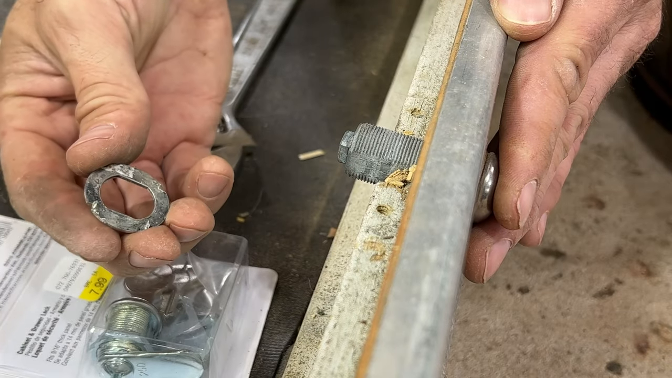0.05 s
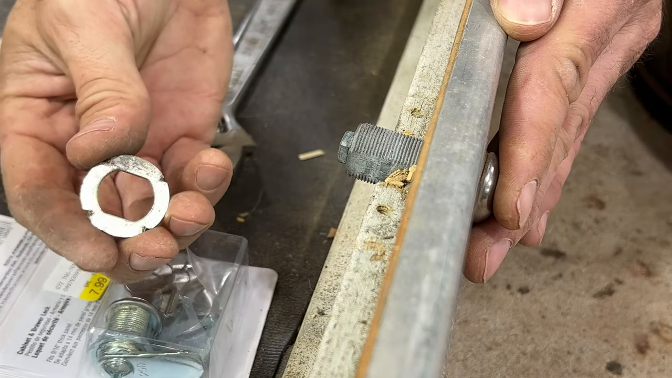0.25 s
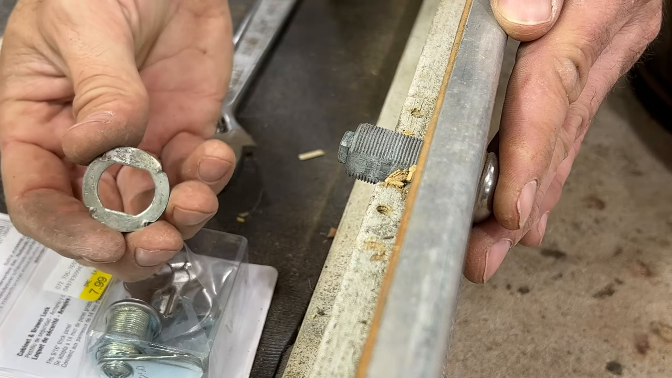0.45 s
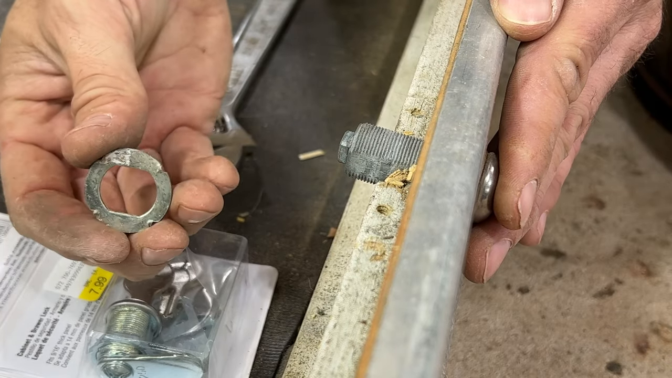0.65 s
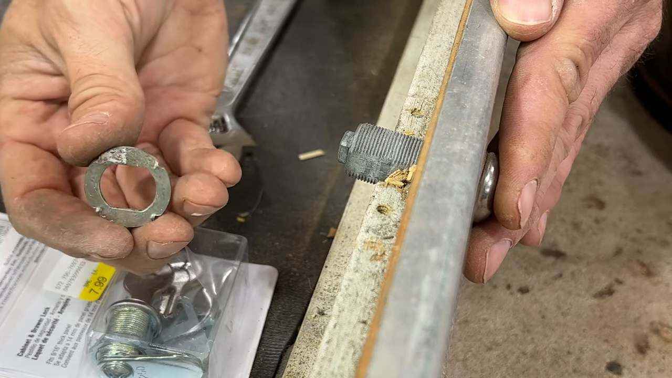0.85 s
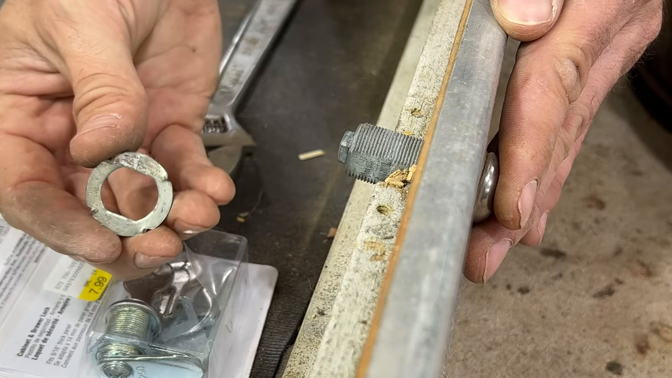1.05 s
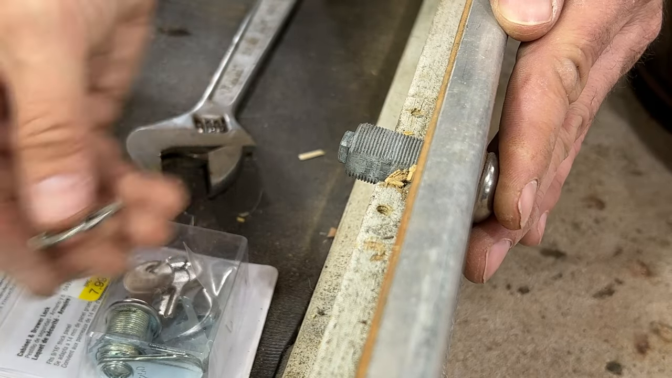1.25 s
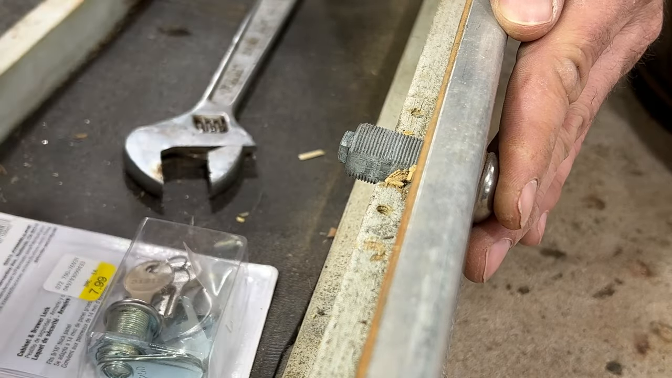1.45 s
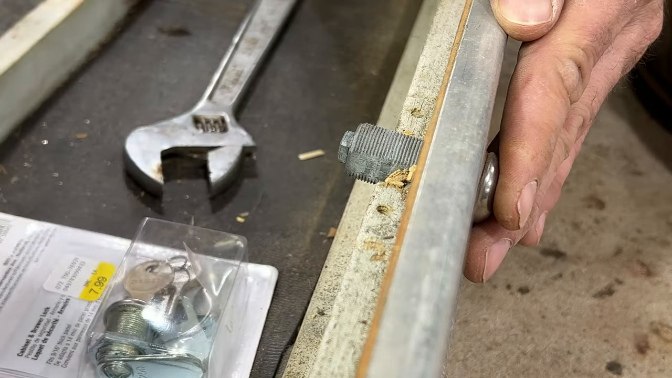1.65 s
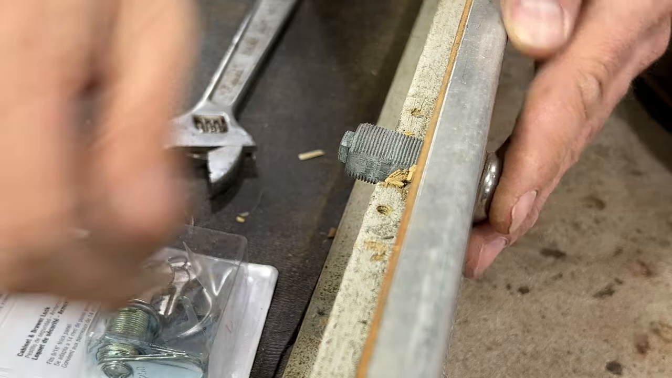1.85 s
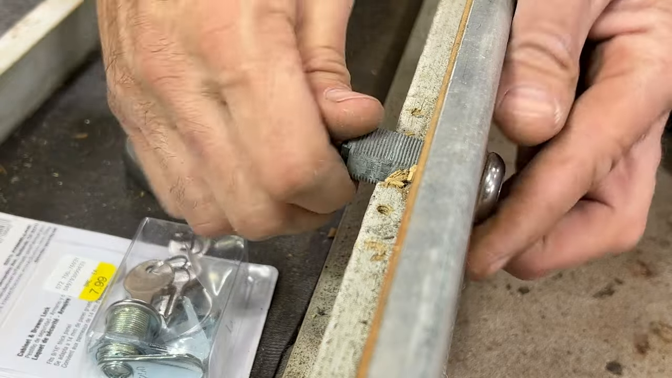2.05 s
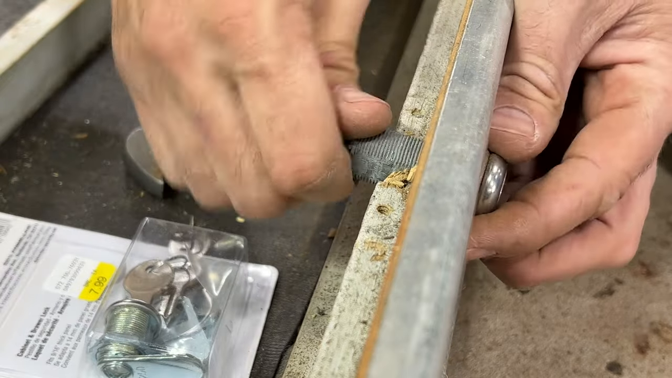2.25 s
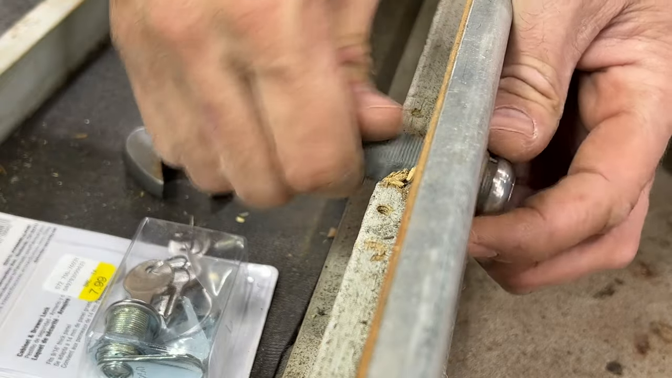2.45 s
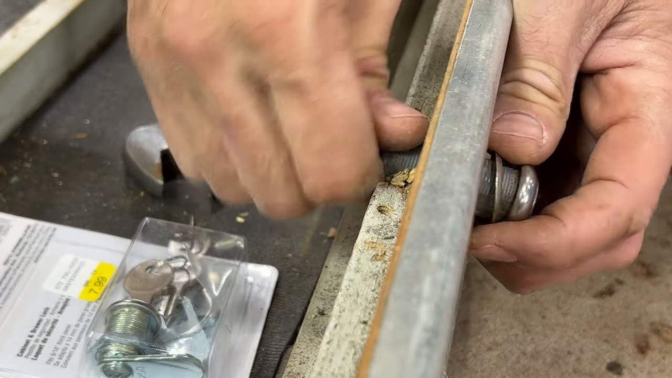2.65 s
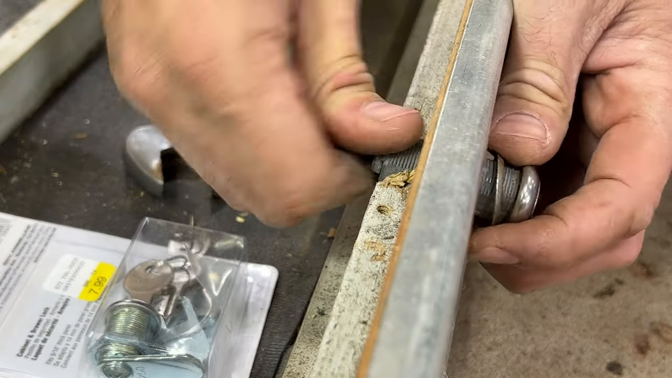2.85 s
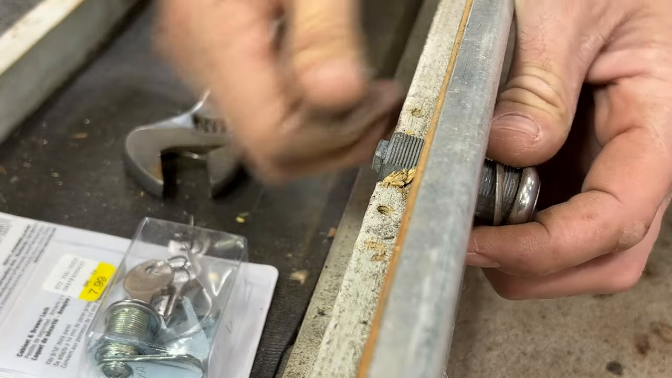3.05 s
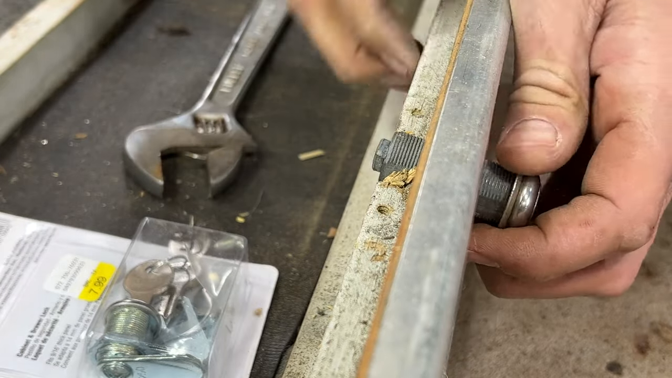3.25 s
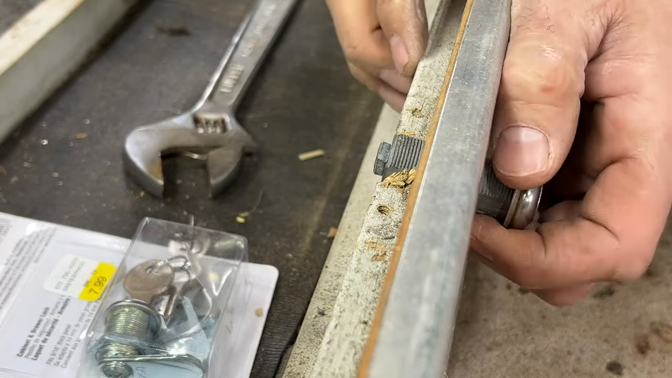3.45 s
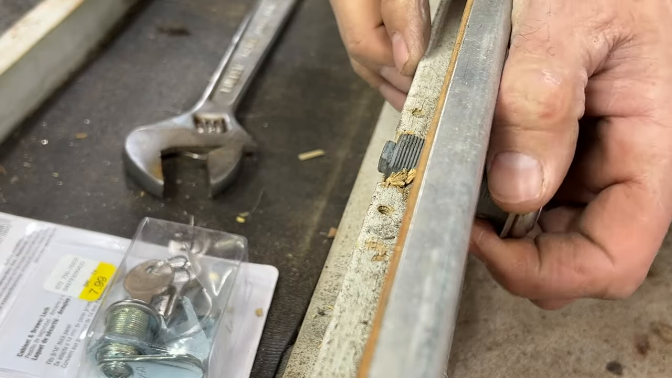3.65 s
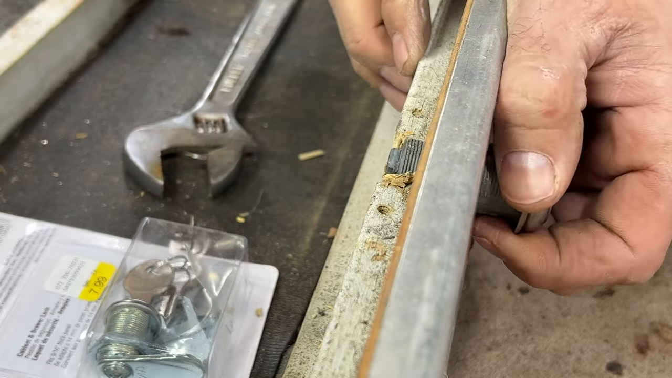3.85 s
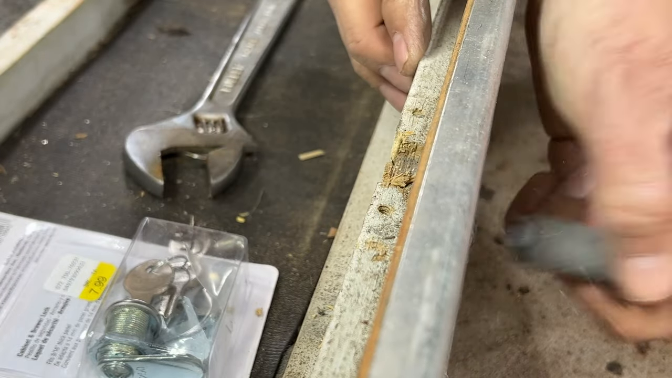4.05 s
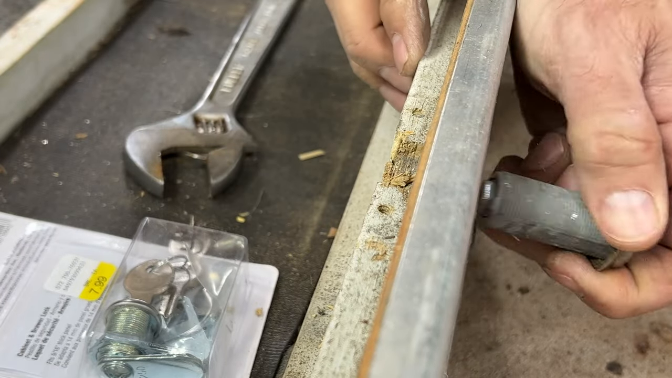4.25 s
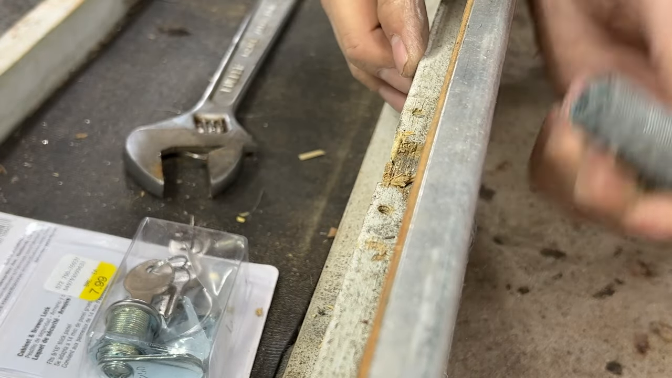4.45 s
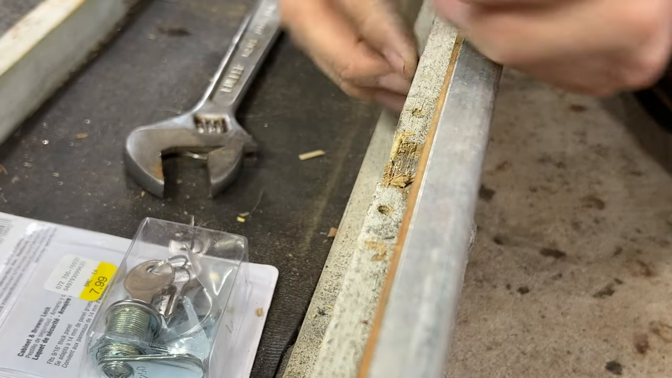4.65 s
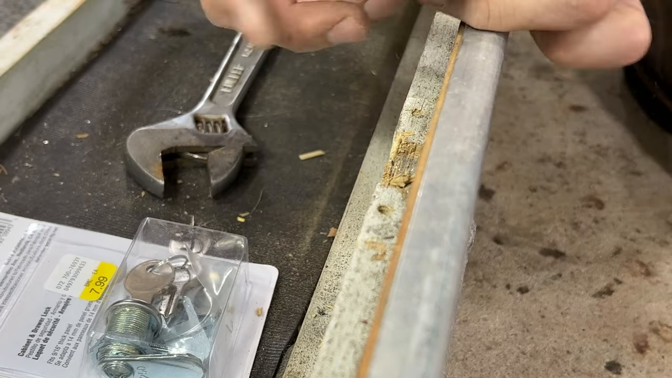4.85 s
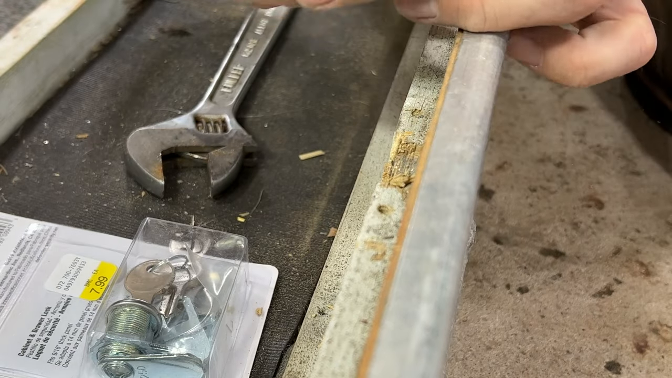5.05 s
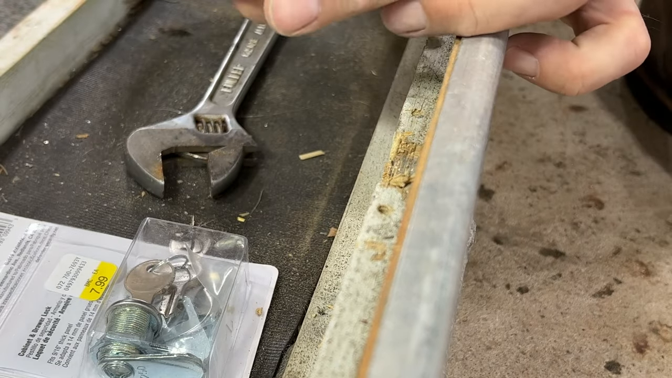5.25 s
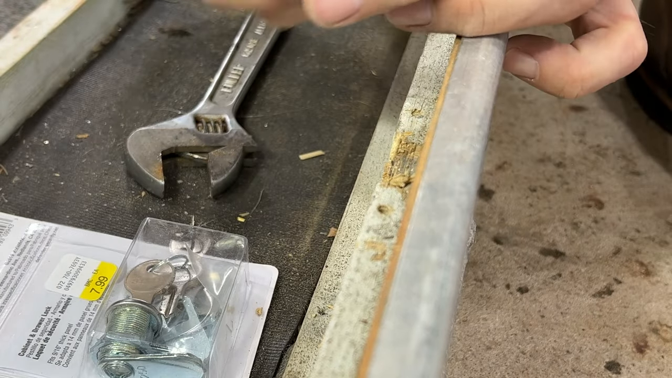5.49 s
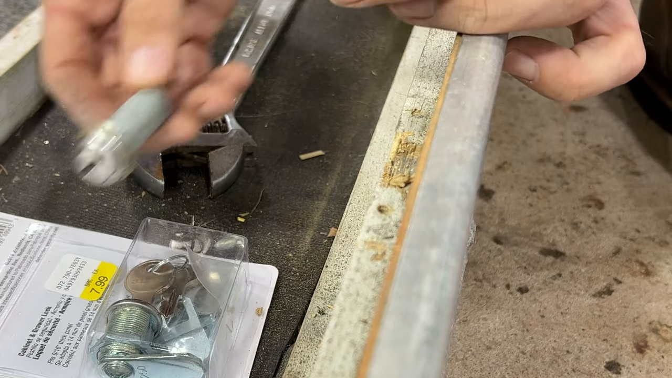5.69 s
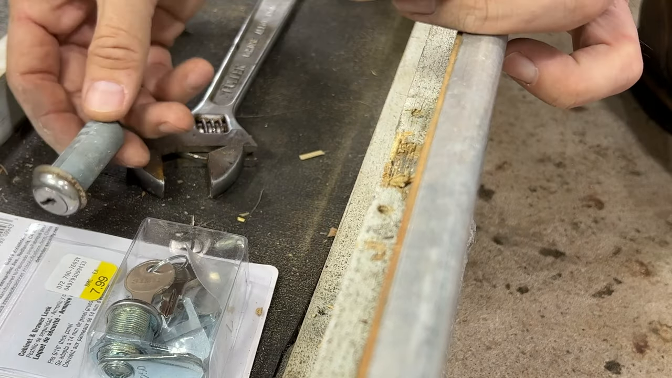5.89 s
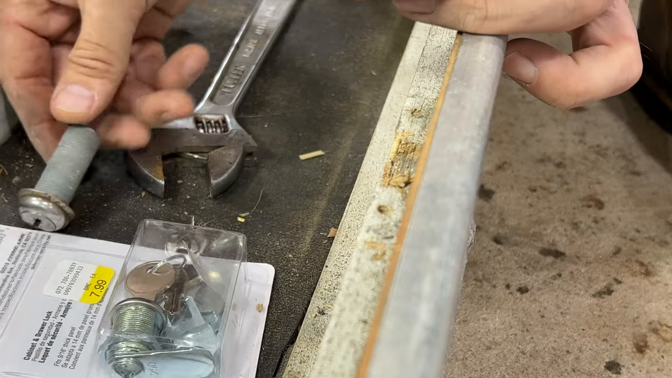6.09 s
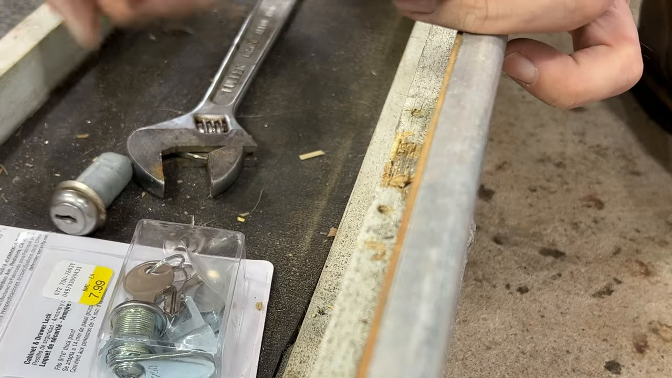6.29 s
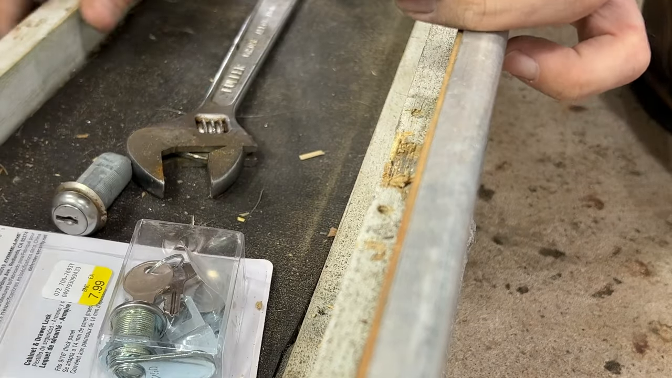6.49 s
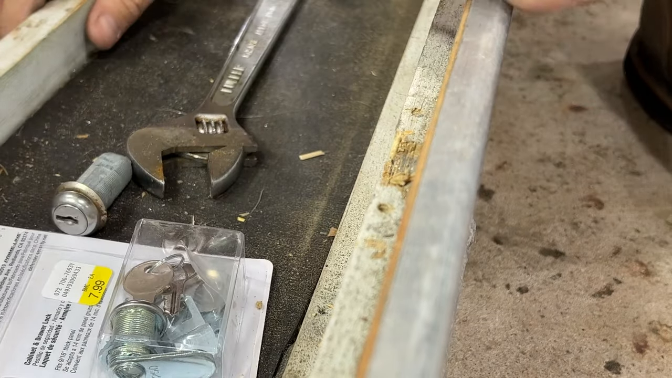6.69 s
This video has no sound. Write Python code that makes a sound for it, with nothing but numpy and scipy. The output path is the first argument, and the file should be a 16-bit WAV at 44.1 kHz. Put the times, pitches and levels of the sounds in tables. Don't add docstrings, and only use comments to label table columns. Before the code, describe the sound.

Fingers tick and scrape at a threaded metal lock, dull knocks jolt a lid, one loud crack frees it, then it thumps down on a bench.

```python
import sys
import numpy as np
from scipy import signal
from scipy.fft import rfft, irfft, next_fast_len
from scipy.io import wavfile
from scipy.ndimage import uniform_filter1d, map_coordinates

SR = 44100
rng = np.random.default_rng(int(sys.argv[2]) if len(sys.argv) > 2 else 0)


def undo_db(level):
    steps = np.asarray(level, float) / 20
    return 10 ** steps


def wrap_up_sound(samples):
    columns = np.atleast_2d(samples).T
    tamed = np.clip(columns, -1, 1)
    steps = np.round(tamed * 32767).astype(np.int16)
    wavfile.write(sys.argv[1], SR, steps)


N = 296519

# [t/s, peak level at 1.5-4 kHz/dB, body/dB, edge/dB]
RIDGE_SNAPS = [
    (2.579, -21, 4.5, -13),
    (3.0515, -23, -1.5, -4),
    (3.2019, -26, 2, -4.5),
    (3.837, -23, -9, -14.5),
    (4.0531, 1.5, 2, -10),
    (4.5067, -35.5, -6, -19),
    (6.5545, -32.5, -2.5, -18),
]
# [t/s, peak level at 1.5-4 kHz/dB, body at 0.5-1.5 kHz/dB, edge at 4-9 kHz/dB]
DRY_TICKS = [(1.1494, -69, -8, 5), (1.594, -30.5, 1.5, -17), (1.6487, -24, 4.5, -24.5),
             (1.6944, -42, 7, -12), (1.8547, -43, -1, -21), (2.058, -34.5, -9, -28),
             (2.1905, -41.5, -2.5, -11), (2.2364, -45.5, -9, -1.5), (2.2787, -45, 6, -25),
             (2.78, -33, -23, -5), (2.8255, -31.5, 0.5, 4), (3.0776, -26.5, -32, -9),
             (3.093, -36.5, -1, -17), (3.306, -39.5, -0.5, -11), (3.37, -37.5, -3, -12),
             (3.5136, -42, 2.5, -7), (3.529, -35.5, -5.5, -8), (3.8064, -48, 6.5, -4),
             (5.7696, -47.5, -15.5, -11.5), (5.9045, -43.5, 13, -10), (5.991, -38, 6, -8.5),
             (6.0698, -46, -12, -26), (6.1035, -25, -7, -22), (6.1663, -25.5, -1, -14),
             (6.2554, -31.5, 0, -16)]
# [t/s, level/dB, body/dB, edge/dB, length/s]
THREAD_RASPS = [(1.613, -39.5, -0.5, -8, 0.016), (1.646, -50.5, -7, -2, 0.0097),
                (2.309, -52, 3.5, -13, 0.0066), (2.602, -38, 5, -15, 0.01), (3.02, -43, 0, -12, 0.012),
                (3.307, -39, 0.5, -11, 0.011), (3.374, -38, -1.5, -12.5, 0.0082),
                (3.532, -36.5, -2, -9.5, 0.0066), (3.535, -45, 2, -5, .025),
                (3.755, -38.5, 1, -9.5, 0.0061), (3.837, -41.5, -0.5, -5, 0.02),
                (4.065, -27.5, 1, -20, 0.028), (5.914, -44, -14, -9, 0.013)]
# [t/s, level/dB, body/dB, edge/dB, length/s]
THREAD_DRAGS = [
    (1.924, -52, 0, -4, 0.03),
    (2.405, -32.5, -2, -7.5, .007),
    (2.463, -54, 9, -1, .02),
    (2.577, -33, 12, -9, 0.0092),
    (3.942, -20.5, 1.5, -10, .012),
    (4.565, -58.5, -8, 6.5, 0.014),
    (6.459, -48.5, 2.5, -6, 0.027),
]
# [f/Hz, width/Hz, level/dB]
EDGE_MODES = [(620, 290, 4), (1040, 190, 7.5), (1410, 180, 9), (1784, 350, 6), (2620, 530, 6.5),
              (4600, 1400, 5.5), (6200, 1700, 8.5), (7930, 1800, 7.5), (12300, 2900, 8.5)]
# [f/Hz, level/dB, t60/s]
LID_MODES = [(50, 4.5, 0.27), (71.3, 4, 0.39), (100.3, -1.5, 0.2), (131.6, -6, 0.32), (176.8, -7, .25),
             (200.7, -2.5, 0.16), (249.5, 2.5, 0.16), (312.7, 3.5, 0.19), (396.5, 3.5, 0.1), (459, 0, .14),
             (510, -0.5, 0.039), (587, -7.5, 0.11), (650, -9, 0.14), (811, -13.5, 0.16)]
# [t/s, peak level at 100-250 Hz/dB, bench below/dB, panel above/dB, struck spot f/Hz]
LID_JOLTS = [(2.081, -47, 3.5, -2, 91.5), (2.409, -13.5, -10, -7, 283), (2.459, -16, -11, -11.5, 181),
             (2.581, -15, -7.5, -0.5, 235), (2.619, -25, -8.5, -3.5, 183), (2.833, -35, -16, -1.5, 99.6),
             (3.029, -36, -28, 7, 304), (3.07, -14.5, -20, -13, 123), (3.206, -23, -12, -2.5, 135),
             (3.221, -13.5, -16, -35, 126), (3.531, -28.5, -26.5, -6, 137),
             (3.756, -15.5, -12.5, -9.5, 300), (3.838, -28, -5.5, -11, 129), (3.936, -2.5, -14, -14.5, 193),
             (4.058, -9.5, -16, -5.5, 108.7), (4.197, -34, 1, -6.5, 91.5), (4.511, -9.5, -13, -15, 191.8),
             (4.55, -11, -10.5, -24, 189), (4.795, -36.5, -23.5, -8, 174)]
# [t/s, peak level/dB, bench below/dB, panel above/dB, struck spot f/Hz]
BENCH_SET_DOWNS = [
    (1.603, -26.5, -18, -15, 186),
    (1.657, -20.5, -51, -5, 209),
    (1.875, -32, -19.5, -18, 140),
    (5.785, -68, 17, -23.5, 92.2),
    (5.902, -48, -16, 0, 285),
    (6.112, -22, -4.5, -18.5, 169),
    (6.169, -41.5, 13, -10, 96.4),
    (6.463, -25, 0, -18.5, 129),
    (6.593, -5.5, -8, -25, 114.5),
]
# [t/s, level/dB, f/Hz, t60/s]
STEEL_CLINKS = [(2.19, -33, 1770, 0.024), (2.405, -28.5, 4700, 0.025), (2.582, -21, 1423, 0.045),
                (3.205, -19, 620, 0.053), (3.757, -36, 12300, 0.025), (3.806, -39, 12500, 0.017),
                (4.005, -36, 12300, 0.038), (4.053, -25, 1040, 0.041), (4.058, -11.5, 318.4, 0.15),
                (5.905, -36.5, 650, 0.03), (5.905, -36, 920, 0.03), (5.928, -40, 2800, 0.043),
                (5.99, -40, 818, 0.035), (4.868, -46, 3446, 0.022), (4.887, -48.5, 12500, 0.037),
                (6.167, -27, 950, 0.022), (6.176, -39, 2800, 0.03), (6.26, -36, 1364, 0.091),
                (6.103, -35, 1980, .018), (6.265, -51.5, 2820, 0.06)]
# [t/s, level/dB, f/Hz, t60/s]
PANEL_NOTES = [(1.649, -33, 1500, .015), (1.651, -32, 446, 0.04), (1.66, -30, 190, .2),
               (1.872, -42, 190, .12), (1.853, -49, 1300, .03), (1.925, -53, 1316, 0.13),
               (1.94, -56, 4070, .06), (2.0, -57, 2890, .1), (2.01, -58, 3900, .08),
               (2.138, -53, 5100, .03), (2.14, -56, 6150, .03), (2.163, -58, 1600, .03),
               (2.41, -30, 780, 0.082), (2.412, -23, 581, .15), (2.588, -28, 445, .18),
               (3.057, -21, 620, 0.071), (3.204, -27, 1050, .04), (3.21, -29, 544, .1),
               (3.22, -41, 2820, .025), (3.757, -37, 1440, 0.045), (3.76, -27, 310, .13),
               (3.94, -14, 197, .16), (3.946, -24, 330, .15), (3.94, -23, 642, .077),
               (3.948, -22.5, 1053, .06), (4.043, -41, 5527, .03), (4.515, -19, 197, .2),
               (4.52, -38, 690, .1), (5.915, -41, 3250, 0.046), (6.003, -46, 800, 0.027),
               (6.011, -46, 2830, 0.038), (6.05, -52, 2330, .03), (6.07, -52, 2010, .03),
               (6.3, -68, 3400, .8), (6.3, -67, 1860, .8), (6.39, -60, 1880, .05), (1.597, -38, 420, .04),
               (1.96, -60, 2600, .08), (2.085, -57, 1500, .05), (2.1, -60, 3660, .1), (2.2, -60, 2600, .15),
               (5.77, -56, 1500, .025), (6.3, -48, 450, .08)]
# [t/s, level/dB, t60/s]
BREAK_FREE = (4.058, -25.5, 0.63)
# [f/Hz, width/Hz, level/dB]
TRIM_BANDS = [(585, 160, -2), (1000, 230, 1), (1760, 430, -1), (2740, 500, -6), (3800, 280, -23),
              (4700, 300, -17), (5540, 300, -18), (6290, 260, -16), (7200, 450, -17), (8150, 250, -21)]
# [f/Hz, level/dB, t60/s]
TRIM_RINGING = [(581, -29.5, .25), (888, -33, .3), (1056, -33, .25), (1631, -35, 0.3), (1850, -36, 0.69),
                (2600, -44, .45), (2854, -43, .45), (4700, -48, .25), (5500, -53, .4), (6300, -50.5, .35),
                (7070, -50.5, .25), (7477, -52.5, .3), (8150, -54.5, .3)]
# [f/Hz, width/Hz, level/dB]
BARREL_MODES = [(1923, 60, -3.5), (744, 66, 1.5), (1470, 120, -2.5), (2640, 60, -6), (3600, 100, -9),
                (5220, 200, -10)]
# [t/s, length/s, leading 1.9 kHz mode level/dB, other modes level/dB]
FINGER_PULLS = [
    (2.054, 0.19, -83, -67),
    (2.286, 0.019, -52.5, -66),
    (2.318, 0.085, -59.5, -95),
    (4.816, 0.085, -70, -95),
    (4.95, 0.12, -79, -95),
]
# [t/s, rumble level/dB]
HAND_GRIP = [(1.0, -99), (1.585, -70), (1.65, -47), (2.39, -52), (2.46, -40), (2.66, -38.5), (2.9, -44),
             (3.28, -33), (3.42, -44.5), (3.9, -44.5), (3.999, -29.5), (4.219, -47), (4.699, -46.5),
             (5.32, -74.5), (5.89, -73.5), (5.92, -52), (6.44, -59), (6.52, -42.5)]
# [t/s, length/s, scrape level/dB, hiss over scrape/dB]
HAND_STROKES = [(.25, 0.034, -77, -16), (1.321, 0.095, -73.5, 2.5), (1.449, .14, -74, 9),
                (1.606, 0.017, -56.5, -12.5), (1.697, 0.06, -74, 0.5), (1.794, 0.24, -60, -0.5),
                (2.083, 0.21, -69.5, -0.5), (2.42, 0.052, -57.5, -16), (2.607, 0.5, -75.5, -33),
                (2.818, 0.07, -62.5, -3), (2.981, 0.11, -57.5, -8), (3.217, 0.18, -54, -7.5),
                (3.476, 0.24, -59.5, -8), (3.776, 0.11, -65, -12), (3.932, 0.12, -60, -23),
                (4.357, 0.1, -61.5, -0.5), (4.536, 0.031, -52.5, -4.5), (4.622, 0.077, -51, -6),
                (4.774, 0.083, -66.5, -7), (4.951, 0.78, -85.5, -14), (5.936, 0.056, -60, -4),
                (5.965, .025, -66, 4), (6.045, .02, -59, -14), (6.078, 0.04, -58, -3),
                (6.175, 0.26, -67, -12), (6.444, 0.073, -58, -7.5), (6.558, 0.051, -53.5, -6),
                (6.656, .08, -50, -2.5)]
# [f/Hz, level per Hz/dB]
RUMBLE_COLOUR = [(25, -24.5), (50, 1.5), (130, -3.5), (200, -8.5), (320, -11.5), (600, -23), (1200, -55)]
# [f/Hz, level per Hz/dB]
SCRAPE_COLOUR = [(300, -35.5), (600, -5.5), (1450, -1), (1800, -3), (2600, -5.5), (4500, -12.5),
                 (6000, -35), (8000, -64)]
# [f/Hz, level per Hz/dB]
HISS_COLOUR = [(1200, -32), (2500, -6.5), (4000, -3), (8500, 2), (10000, -4.5), (11500, -29.5)]
# [f/Hz, level per Hz/dB]
SKIN_COLOUR = [(9000, -59), (10400, -11.5), (11500, -3), (13000, -0.5), (15000, -1), (15900, -7),
               (17000, -38)]
# [t/s, length/s, level/dB]
SKIN_SWEEPS = [(1.12, .17, -74.5), (1.99, 0.032, -61), (2.8, .03, -71), (3.29, 0.054, -71),
               (3.51, 0.033, -61), (4.78, 0.074, -66), (4.96, .02, -77), (5.06, 0.039, -73),
               (5.27, .05, -76), (5.41, .08, -75.5), (5.6, .09, -77), (5.77, 0.045, -77),
               (6.085, .03, -63.5)]
# [t/s, length/s, level/dB]
NAIL_FLICKS = [(1.03, .015, -77), (1.08, .003, -74), (1.148, .008, -66), (2.236, .003, -59),
               (2.405, .008, -46), (2.576, 0.0091, -44), (2.825, 0.0014, -40.5), (3.052, 0.0073, -44),
               (3.327, .002, -60), (3.41, .002, -56), (3.44, .002, -59), (3.838, 0.014, -60),
               (3.942, .012, -35.5), (4.052, .002, -23), (4.335, .002, -57), (4.96, 0.0041, -66),
               (5.142, .004, -67), (5.949, 0.0032, -64), (6.255, .004, -59)]
# [f/Hz, t60/s]
GARAGE_T60 = [(200, 0.52), (1000, 0.71), (3000, 0.6), (8000, 0.53), (14000, 0.29)]
# [f/Hz, level per Hz/dB]
AIR_COLOUR = [(28, -29.5), (45, 1.5), (80, 0.5), (150, -7), (1500, -26.5), (8000, -34.5), (13000, -29.5),
              (16500, -48.5)]
# [f/Hz, lead/rad]
PORT_LEAD = [(100, .2), (340, .6), (2300, 0), (3600, .74), (4500, .1), (7000, -.2), (8000, -.8),
             (9050, -2.2), (10950, -4.1), (12700, -5.4), (14300, -7.2), (16000, -8.6)]
# [f/Hz, lead/rad]
NEAR_LEAD = [(250, .3), (550, 1.5), (900, 0.68), (1100, 0.77), (2200, .1), (2700, .4), (5000, 0.4),
             (8000, 0.16)]
# [f/Hz, level/dB]
PORT_LEVEL = [(60, 0.5), (110, 2.5), (200, 2.5), (600, 3), (2380, -0.5), (4400, 0), (8120, 0.5),
              (15000, -0.5)]
# [f/Hz, likeness from 0 to 1]
PORT_LIKENESS = [(40, 1), (150, .9), (300, 0.89), (600, 0.77), (1200, .4), (1800, 0.77), (3400, 0.77),
                 (5000, 0.9)]

AIR_DB, ROOM_DB = -67, -18.5
RING_TO_ROOM = 0.4
JOLT_RING, SET_DOWN_RING = 1, 0.82
RASP_RISE_S, DRAG_RISE_SHARE = 0.006, 0.99
STROKE_RISE_DB_PER_S, STROKE_FALL_DB_PER_S = 450, 259.5
PULL_RISE_DB_PER_S, PULL_FALL_DB_PER_S = 600, 252
SWEEP_DB_PER_S, FLICK_DB_PER_S = 202, 3000
SWISH_DB, SWISH_FOLLOWS, HISS_USUAL_DB = -64, 0.72, -67
BARREL_WAVER_DB = 3
LOW_HZ, TOP_HZ, STEADY_TOP_HZ = 32.26, 16300, 15800


def unit(x):
    return x / np.sqrt(np.mean(x ** 2) + 1e-20)


def along(points, hz):
    f, v = np.transpose(points)
    return np.interp(np.log(hz + 1), np.log(f + 1), v)


def filtered(x, response):
    n = x.shape[-1]
    m = next_fast_len(n + 4096)
    return irfft(rfft(x, m) * response(np.fft.rfftfreq(m, 1 / SR)), m)[..., :n]


def resonances(modes):
    def response(f):
        total = 0
        for k, (centre, width, db) in enumerate(modes):
            bandwidth = 1j * f * width
            total = total + (-1) ** k * undo_db(db) * bandwidth / (centre ** 2 - f * f + bandwidth)
        return total
    return response


def wobble(rate):
    at = np.arange(0, N + 32, 32)
    knots = rng.standard_normal(int(N * rate / SR) + 4)
    return np.interp(np.arange(N), at, map_coordinates(knots, [at * rate / SR]))


def rush(spectrum, lumpy_db, rate):
    noise = rng.standard_normal((2, N)) * undo_db(lumpy_db * wobble(rate))
    return unit(filtered(noise, lambda hz: undo_db(along(spectrum, hz))))


def swells(rows, db, rise_db_per_s, fall_db_per_s):
    t = np.arange(0, N, 64) / SR
    s, length = np.transpose(rows)[:2, :, None]
    before_db = rise_db_per_s * np.clip(s - t, 0, None)
    after_db = fall_db_per_s * np.clip(t - s - length, 0, None)
    gain = undo_db(db[:, None] - before_db - after_db).sum(axis=0)
    return np.interp(np.arange(N) / SR, t, gain)


def add(track, s, sound):
    part = track[..., round(s * SR):][..., :sound.shape[-1]]
    part += sound[..., :part.shape[-1]]


def contact(out, s, db, body_db, edge_db, rise, length, t60, damping=1, blow=0):
    t = np.arange(SR // 8) / SR - rise
    swell = np.clip(1 + t / rise, 0, 1) ** 2
    slips = rng.standard_normal(len(t)) * swell * undo_db(-60 * np.clip(t - length, 0, 1) / t60)
    slips[round(rise * SR)] -= blow
    colour = [(250, body_db - 19.0), (550, body_db + 11.0), (1200, body_db + 5.5), (1800, 0.013),
              (3500, 0.012), (5000, edge_db + 1.5), (16000, edge_db - 7.5)]
    metal = resonances(EDGE_MODES * np.array([1, damping, 1]))
    add(out, s - rise, undo_db(db) * filtered(slips, lambda f: metal(f) * undo_db(along(colour, f))))


def snaps():
    out = np.zeros(N)
    for s, db, body_db, edge_db in DRY_TICKS:
        contact(out, s, db - 2.5, body_db, edge_db,
                rise=0.0004, length=0.0007, t60=0.012, damping=1.25, blow=7)
    for s, db, body_db, edge_db in RIDGE_SNAPS:
        contact(out, s, db - 2.5, body_db, edge_db, rise=0.0015, length=0.0023, t60=0.016)
        contact(out, s + 0.0072, db - 17.5, body_db + 6, edge_db, rise=0.0017, length=0.0016, t60=0.027)
    for *row, length in THREAD_RASPS:
        contact(out, *row, rise=RASP_RISE_S, length=length / 2, t60=0.019 + 4.2 * length)
    for *row, length in THREAD_DRAGS:
        contact(out, *row, rise=DRAG_RISE_SHARE * length, length=length, t60=0.015)
    return out


def thumps(rows, ring):
    out, t = np.zeros((2, N)), np.arange(SR * 2 // 5) / SR
    hz, level_db, t60 = np.transpose(LID_MODES)[:, :, None]
    swell = (1 - np.exp(-(t / 0.0064) ** 2)) * undo_db(-60 * t / (t60 * ring))
    for s, db, bench_db, panel_db, spot_hz in rows:
        level_draw, pitch_draw, phase_draw = rng.standard_normal((3, 2, len(LID_MODES), 1))
        tilt_db = along([(80, bench_db), (120, -1.0), (220, -3), (290, panel_db)], hz)
        spot_db = 6 * np.exp(-(np.log(hz / spot_hz) / 0.15) ** 2)
        gain = undo_db(level_db + tilt_db + spot_db + 1.6 * level_draw)
        phase = 2 * np.pi * hz * (1 + 0.036 * pitch_draw) * t + 1.5 * phase_draw
        modes = gain * swell * np.sin(phase.astype('f'))
        add(out, s - 0.004, undo_db(db - 3.5) * modes.sum(axis=1))
    return out


def clinks(rows, wander=0.05):
    out, t = np.zeros(N), np.arange(SR // 2) / SR
    for s, db, hz, t60 in rows:
        drift = np.cumsum(rng.standard_normal(len(t))) * wander
        envelope = undo_db(db - 60 * t / t60) * (1 - np.exp(-t / 0.0016))
        add(out, s, envelope * np.sin(2 * np.pi * hz * t + drift))
    return out * undo_db(3 * wobble(60))


def trim():
    s, db, t60 = BREAK_FREE
    out, t = np.zeros((2, N)), np.arange(SR) / SR

    def bands(f):
        return sum(undo_db(level) * resonances([(hz, width, 0)])(f) ** 2 for hz, width, level in TRIM_BANDS)

    buzz = unit(filtered(rng.standard_normal((2, SR)), bands))
    add(out, s, buzz * undo_db(db - 60 * t / t60))
    return out


def barrel():
    leading, rest = [swells(FINGER_PULLS, db, PULL_RISE_DB_PER_S, PULL_FALL_DB_PER_S)
                    for db in np.transpose(FINGER_PULLS)[2:]]
    modes = []
    for hz, width, db in BARREL_MODES:
        tone = unit(filtered(rng.standard_normal(N), resonances([(hz, width, 0)])))
        modes.append(undo_db(db + BARREL_WAVER_DB * wobble(29.33)) * tone)
    return leading * modes[0] + rest * sum(modes[1:])


def hands():
    scrape_db, over_db = np.transpose(HAND_STROKES)[2:]
    drag, slip = [swells(HAND_STROKES, db, STROKE_RISE_DB_PER_S, STROKE_FALL_DB_PER_S)
                  for db in (scrape_db, scrape_db + over_db)]
    grit = undo_db(1.2 * wobble(60))
    grip_db = np.interp(np.arange(N) / SR, *np.transpose(HAND_GRIP))
    rumble = undo_db(grip_db + 2.0) * rush(RUMBLE_COLOUR, lumpy_db=2.5, rate=34)
    scrape = drag * rush(SCRAPE_COLOUR, lumpy_db=1.5, rate=250)
    hiss = slip * rush(HISS_COLOUR, lumpy_db=0.5, rate=120)
    swish_gain = undo_db(SWISH_DB) * (slip / undo_db(HISS_USUAL_DB)) ** SWISH_FOLLOWS
    swish = swish_gain * rush(SKIN_COLOUR, lumpy_db=0.5, rate=90)
    return rumble + grit * (scrape + hiss + swish)


def brushes():
    sweeps, flicks = [swells(rows, np.transpose(rows)[2], rate, rate)
                      for rows, rate in ((SKIN_SWEEPS, SWEEP_DB_PER_S), (NAIL_FLICKS, FLICK_DB_PER_S))]
    return (sweeps + flicks) * rush(SKIN_COLOUR, lumpy_db=1.5, rate=60)


def garage(x):
    hz, t, z = signal.stft(rng.standard_normal((2, SR * 3 // 4)), SR, nperseg=256)
    decay = undo_db(-60 * t / along(GARAGE_T60, hz)[:, None])
    tail = signal.istft(z * decay, SR, nperseg=256)[1]
    late = np.pad(x, (250, 0))[None]
    return signal.fftconvolve(late, tail / np.linalg.norm(tail[0]), axes=1)[:, :N]


def air():
    return undo_db(AIR_DB) * rush(AIR_COLOUR, lumpy_db=0.8, rate=6)


def ports(near, shared, apart):
    def turn(hz):
        return np.arccos(np.clip(along(PORT_LIKENESS, hz), -1, 1)) / 2

    mid = filtered(shared, lambda hz: np.cos(turn(hz)))
    side = filtered(apart, lambda hz: np.sin(turn(hz)))
    half = np.array([[0.5], [-0.5]])
    slanted = filtered(near, lambda hz: np.exp(1j * half * along(NEAR_LEAD, hz)))
    pair = np.array([mid + side, mid - side]) + slanted
    return filtered(pair, lambda hz: undo_db(half * along(PORT_LEVEL, hz)) * np.exp(1j * half * along(PORT_LEAD, hz)))


def scene():
    edge = snaps()
    steel = clinks(STEEL_CLINKS)
    knocks = thumps(LID_JOLTS, JOLT_RING) + thumps(BENCH_SET_DOWNS, SET_DOWN_RING)
    room = undo_db(ROOM_DB) * garage(edge + RING_TO_ROOM * steel)
    shared, apart = knocks + trim() + hands() + room + air()
    trim_ring = clinks([(BREAK_FREE[0], db, hz, t60) for hz, db, t60 in TRIM_RINGING])
    singing = barrel() + trim_ring
    skin = brushes()
    near = edge + steel + clinks(PANEL_NOTES, wander=0.09)
    return ports(near, shared + singing + skin[0], apart + skin[1])


def joint_stereo(x, drop_db, jump_db, from_hz):
    hz, _, z = signal.stft(np.array([x[0] + x[1], x[0] - x[1]]) / 2, SR, nperseg=512)
    power = uniform_filter1d(np.abs(z) ** 2, size=8, axis=1)
    power = np.abs(uniform_filter1d(power, size=3, axis=2))
    bright = (np.abs(z[:, hz > 3000]) ** 2).sum(axis=(0, 1))
    attack = bright > undo_db(2 * jump_db) * np.roll(bright, 1)
    keep = (power > undo_db(-2 * drop_db) * power[::-1]) | attack | (hz < from_hz)[:, None]
    keep &= attack | (hz < STEADY_TOP_HZ)[:, None]
    mid, side = signal.istft(z * np.where(keep, 1, 0.003), SR, nperseg=512)[1][:, :N]
    return np.array([mid + side, mid - side])


def low_pass(x):
    return signal.sosfilt(signal.butter(12, 16490, fs=SR, output="sos"), x)


def record(dry):
    def band(hz):
        return 1 / (1 + (hz / TOP_HZ) ** 40) / (1 - 1j * LOW_HZ / (hz + 1)) ** 2

    x = filtered(dry, band)
    x = x / (1 + np.abs(x) ** 12) ** (1 / 12)
    x = joint_stereo(x, drop_db=6, jump_db=10, from_hz=1500)
    mix = np.clip(x, -1, 1)
    return low_pass(mix)


dry = scene()
out = record(dry)
wrap_up_sound(out)
```